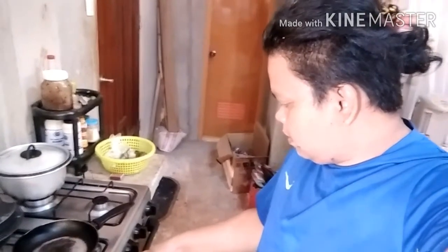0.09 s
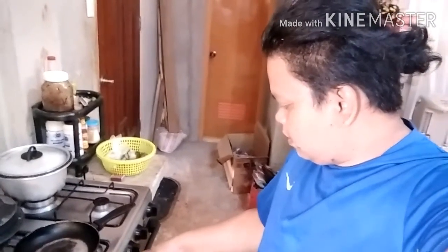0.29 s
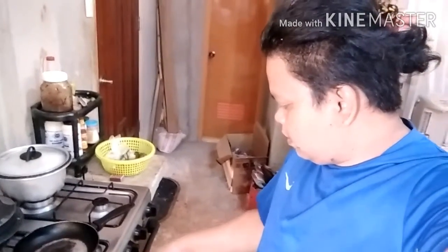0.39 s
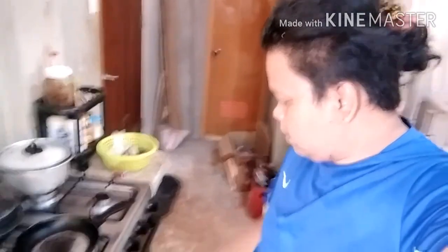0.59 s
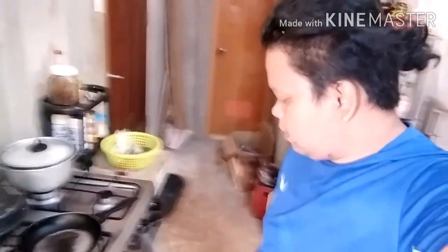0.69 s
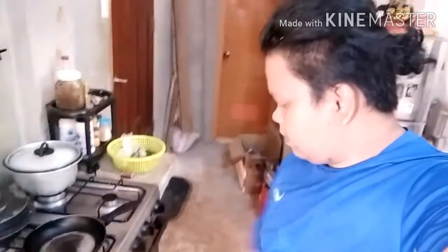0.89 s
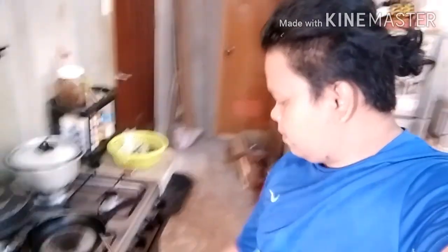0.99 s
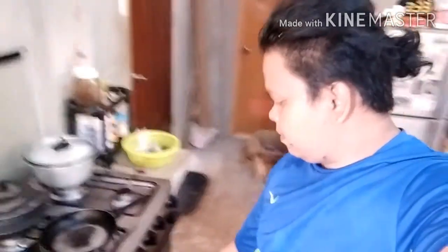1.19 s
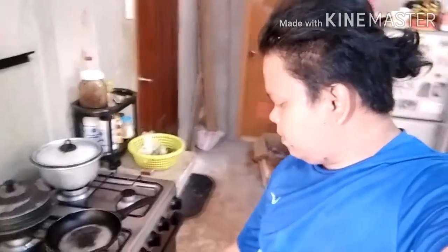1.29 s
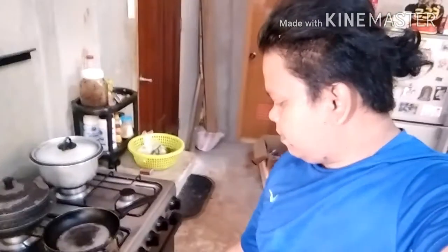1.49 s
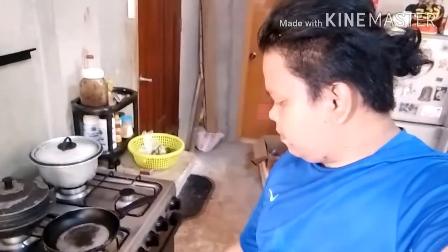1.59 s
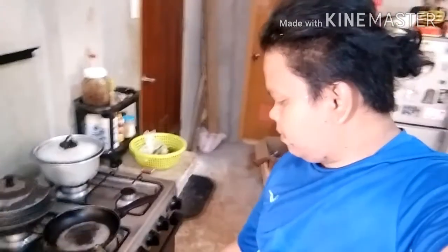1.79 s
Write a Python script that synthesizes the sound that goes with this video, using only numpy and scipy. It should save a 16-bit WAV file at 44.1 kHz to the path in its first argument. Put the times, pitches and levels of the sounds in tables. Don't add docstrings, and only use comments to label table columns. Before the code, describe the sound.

A spark lighter snaps sharply twice in a hard-walled kitchen, then a metal clank and knock.

```python
import sys
import numpy as np
from scipy import signal
from scipy.fft import rfft, irfft
from scipy.io import wavfile

SR = 44100
rng = np.random.default_rng(int(sys.argv[2]) if len(sys.argv) > 2 else 0)


def volts(x):
    e = np.asarray(x, float) / 20
    return 10 ** e


def to_wav(s):
    ch = np.atleast_2d(s).T
    pcm = np.round(np.clip(ch, -1, 1) * 32767)
    wavfile.write(sys.argv[1], SR, pcm.astype(np.int16))


N = 79380
LEAD = 8820
TOTAL = N + LEAD

# start in seconds, level in dB, rattle length in seconds, jolt level in dB.
SNAP_HITS = [
    (-.145, -2.5, 0.004, -28),
    (.2117, -2, 0.0046, -26),
    (0.5355, -2.5, 0.0042, -17.5),
]
# start in seconds, level in dB, rattle length in seconds.
TICK_HITS = [
    (.0292, -29, 0.0095),
    (.2085, -48, .002),
    (.3924, -24.5, .005),
    (.4797, -32.5, .005),
    (.5328, -41.5, 0.0023),
    (.7027, -26, 0.014),
]
CRACK_HITS = [
    (.2117, -15, 0.0044),
    (.5358, -16, 0.0046),
    (.7950, -31.5, 0.0071),
    (.8105, -35, 0.0085),
]
KNOCK_HITS = [
    (.3535, -19.5, 0.021),
    (.7947, -12, .011),
    (.8105, -22, .006),
]
CLANK_HITS = [
    (.7500, -10.5, 0.014),
]
BUMP_HITS = [
    (1.2895, -38.5, 0.015),
    (1.3262, -36, 0.0091),
]
THUD_HITS = [
    (1.4400, -36.5, 0.013),
]
TAP_HITS = [
    (1.5745, -21, 0.0051),
]

# frequency in Hz, level in dB per Hz.
SNAP_TONE = [(250, -22.5), (750, -17), (1350, -17.5), (2050, -3), (3300, -7), (7000, -18), (9000, -16),
             (16000, -34.5)]
TICK_TONE = [(400, -32), (1140, -13), (2200, 0), (5000, -10), (6800, -19.5), (9400, -21.5), (16000, -36.5)]
CRACK_TONE = [(3000, -29.5), (6500, -5), (10500, 8), (16000, -12)]
KNOCK_TONE = [(120, -33), (300, -13.5), (600, -4.5), (2360, -4), (3500, -8.5), (4500, -19), (9400, -32.5),
              (16000, -53.5)]
CLANK_TONE = [(200, -41.5), (520, -16.5), (1400, -5.5), (2750, -3), (4500, -10.5), (6000, -18),
              (8700, -16.5), (16000, -43.5)]
BUMP_TONE = [(59, -26), (100, -12.5), (278, -1), (698, -4.5), (1720, -2), (4320, -34), (5490, -21.5),
             (12000, -51), (15600, -90), (22000, -120)]
THUD_TONE = [(200, -21), (600, 4.5), (1000, -9), (3000, -16), (8000, -44)]
TAP_TONE = [(300, -41.5), (750, -6), (1700, 0.5), (3000, -4), (3700, -15.5), (5800, -31), (8000, -40.5),
            (16000, -52)]

# frequency in Hz, level in dB, 60 dB fade in seconds.
SNAP_RING = [(1679, -8, 0.072), (1955, 0, 0.049), (2254, -3.5, .045), (3318, -8.5, .045),
             (4850, -9.5, 0.02514), (5450, -10, 0.01), (9500, -19, .012)]
KNOCK_RING = [(558, -2, 0.11), (808, -7, 0.065), (1107, -12, 0.082), (1323, -6, .07), (1570, -22, 0.037),
              (2170, 1, .04), (2960, -2, .04)]
CLANK_RING = [(567.5, -12, .09), (1375, -8, 0.056), (1586, -10, 0.14), (2190, -10.5, 0.052),
              (2790, -2, 0.031), (3630, -9, .05), (4480, -7.5, .05), (7580, -18, 0.024),
              (8690, -21.5, 0.057)]
BUMP_RING = [(289, 13, 0.23), (5450, -14, .15)]
TAP_RING = [(2076, 11, 0.039), (3050, 5, 0.034), (5450, -38, 0.084), (5850, -16, 0.043)]
JOLT_RING = [(88, -6, 0.15), (198, -12.5, 0.0067), (422, 8, 0.028)]

# frequency in Hz, level in dB per Hz.
HUM_TONE = [(25, -35), (75, -4.5), (160, -3), (400, -13), (1700, -19), (4200, -28.5), (6000, -41.5),
            (16000, -45.5)]
# delay in seconds, level in dB.
WALL_ECHOES = [(.0175, -19.5)]
# band centre in Hz, 60 dB fade in seconds, level in dB.
ROOM_BANDS = [(125, 0.84, -9.5), (250, 0.55, -9), (530, 0.69, -13), (1046, 0.56, -13.5), (1960, 0.54, -13),
              (4250, 0.51, -16), (7800, 0.45, -16), (14000, 1, -29.5)]
# opening time in seconds, time it starts to shut in seconds.
GATE_SPANS = [
    (-.1, .082),
    (.2080, .516),
    (.5320, .997),
    (1.3245, 1.362),
    (1.5725, 1.712),
]


def spectrum_gain(f, table):
    hz, db = np.array(table, float).T
    return np.interp(np.log(f), np.log(hz), db)


def hum():
    t = (np.arange(TOTAL) - LEAD) / SR
    f = np.maximum(np.fft.rfftfreq(TOTAL, 1 / SR), 15)
    bed = irfft(rfft(rng.standard_normal(TOTAL)) * volts(spectrum_gain(f, HUM_TONE)), TOTAL)
    drift_db = np.interp(t, np.linspace(t[0], t[-1], 30), rng.standard_normal(30))
    murmur = volts(-44.5 + 1.5 * drift_db) * bed / bed.std()

    start_s, end_s, fade_s = 1.46, 1.8, 0.03
    on = np.clip(np.minimum(t - start_s, end_s - t) / fade_s, 0, 1)
    whistle_db = -42 + drift_db - 14 * (t - 1.5)
    whistle = volts(whistle_db) * on * np.sin(2 * np.pi * 1700 * t)
    return murmur + whistle


def colour(table):
    f = np.maximum(np.arange(1025) * SR / 2048, 15)
    cepstrum = irfft(spectrum_gain(f, table) * np.log(10) / 20)
    cepstrum[1:1024] *= 2
    cepstrum[1025:] = 0
    h = irfft(np.exp(rfft(cepstrum)))[:512]
    return h / np.sqrt(np.sum(h ** 2))


def ring(modes):
    t = np.arange(SR // 5) / SR
    swell = 1 - np.exp(-t / 0.00062)
    tones = sum(volts(db) * np.sin(2 * np.pi * hz * t) * 1000 ** (-t / t60) for hz, db, t60 in modes)
    return tones * swell


def start_sample(seconds):
    return max(int(seconds * SR) + LEAD, 0)


def through(x, response):
    return signal.fftconvolve(x, response)[:TOTAL]


def hits(rows, tone, modes=None, modes_db=-9.0, wet_db=-1.5, wet_modes_db=-8.0, alike=0.0):
    size = 2048
    rattle, blow, send = np.zeros((3, TOTAL + size))
    t = np.arange(size) / SR
    own = rng.standard_normal(size)
    for row in rows:
        start, level, length = row[0], volts(row[1]), row[2]
        fresh, grain = rng.standard_normal((2, size))
        shape = (1 - np.exp(-t / 0.0002)) * np.exp(-(t / length) ** 2)
        rough = volts(1.5 * np.repeat(grain[::32], 32))
        x = (alike * own + np.sqrt(1 - alike ** 2) * fresh) * shape * rough
        at = start_sample(start)
        rattle[at:at + size] += level * x / np.sqrt(np.sum(x ** 2) / length / SR)
        blow[at] = level
        send[at] = level * np.sqrt(length * SR)
    response = colour(tone)
    rung = 0 if modes is None else volts(modes_db) * through(blow, ring(modes))
    close = through(rattle, response) + rung
    wet = volts(wet_db) * (through(send, response) + volts(wet_modes_db) * rung)
    return np.array([close, wet])


def snaps():
    return hits(SNAP_HITS, SNAP_TONE, SNAP_RING, modes_db=-0.5, wet_db=2.5, wet_modes_db=-5.0, alike=0.8)


def jolts():
    shove = np.zeros(TOTAL)
    for start, _, _, db in SNAP_HITS:
        shove[start_sample(start)] = volts(db)
    return through(shove, ring(JOLT_RING))


def ticks():
    return hits(TICK_HITS, TICK_TONE, wet_db=-3.5)


def cracks():
    return hits(CRACK_HITS, CRACK_TONE, wet_db=-12.0)


def knocks():
    return hits(KNOCK_HITS, KNOCK_TONE, KNOCK_RING, modes_db=-2.5, wet_db=2.0, wet_modes_db=-4.0)


def clanks():
    return hits(CLANK_HITS, CLANK_TONE, CLANK_RING, modes_db=7.5, wet_db=0.5, wet_modes_db=-5.0)


def bumps():
    return hits(BUMP_HITS, BUMP_TONE, BUMP_RING, modes_db=-10.0, wet_db=6.5)


def thuds():
    return hits(THUD_HITS, THUD_TONE, wet_db=4.0)


def taps():
    return hits(TAP_HITS, TAP_TONE, TAP_RING, modes_db=-7.5, wet_db=8.5, wet_modes_db=-13.0)


def far_wall(close):
    dull = signal.sosfilt(signal.butter(2, 5000.0, fs=SR, output="sos"), close)
    return sum(volts(db) * np.roll(dull, int(delay * SR)) for delay, db in WALL_ECHOES)


def kitchen(send):
    t = np.arange(SR) / SR
    build_up = 1 - np.exp(-(t / 0.005) ** 2)
    h = np.zeros(SR)
    for hz, t60, db in ROOM_BANDS:
        edges = [hz / 1.41, min(hz * 1.41, 0.48 * SR)]
        octave = signal.butter(2, edges, "band", fs=SR, output="sos")
        band = signal.sosfilt(octave, rng.standard_normal(SR))
        h += volts(db - 24.5) * band * 1000 ** (-t / t60) * build_up
    return through(send, h)


def scene():
    close, send = snaps() + ticks() + cracks() + knocks() + clanks() + bumps() + thuds() + taps()
    heard = hum() + close + jolts() + far_wall(close) + kitchen(send)
    return heard[None, LEAD:]


def gate():
    t = np.arange(N) / SR
    open_s, shut_s = 0.002, 0.019
    spans = []
    for opens, shuts in GATE_SPANS:
        rise = np.clip((t - opens) / open_s, 0, 1)
        spans.append(rise / (1 + (np.maximum(t - shuts, 0) / shut_s) ** 2))
    return np.max(spans, axis=0)


def band_limit(x):
    return signal.sosfilt(signal.butter(12, 16360, fs=SR, output="sos"), x)


def record(dry):
    low_cut = signal.butter(2, 29, "high", fs=SR, output="sos")
    top_cut = signal.ellip(6, 0.5, 40, 15600, fs=SR, output="sos")
    band = signal.sosfilt(top_cut, signal.sosfilt(low_cut, dry))
    clipped = np.clip(1.042 * band, -1, 1)
    gated = clipped * volts(-19 * (1 - gate()))
    hiss = volts(-81) * rng.standard_normal(N)
    return band_limit(gated + hiss)


dry = scene()
out = record(dry)
to_wav(out)
```